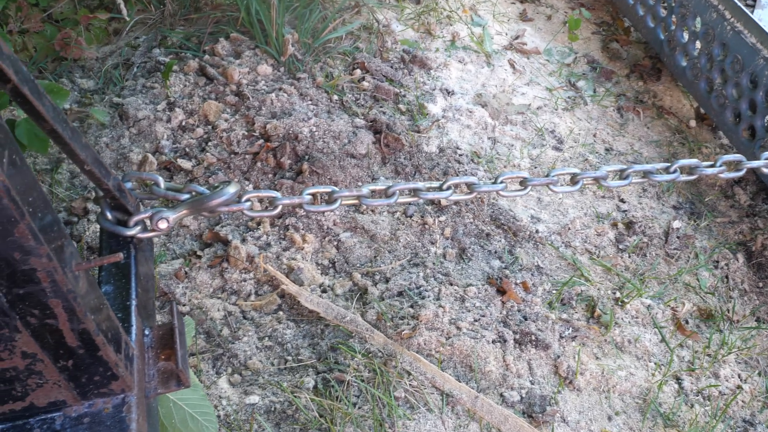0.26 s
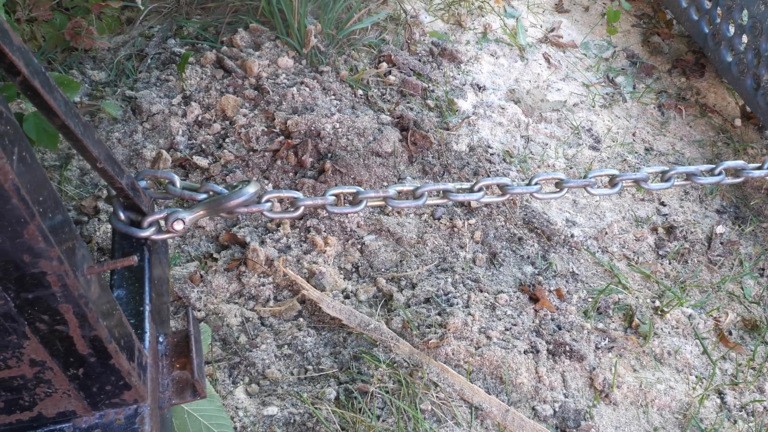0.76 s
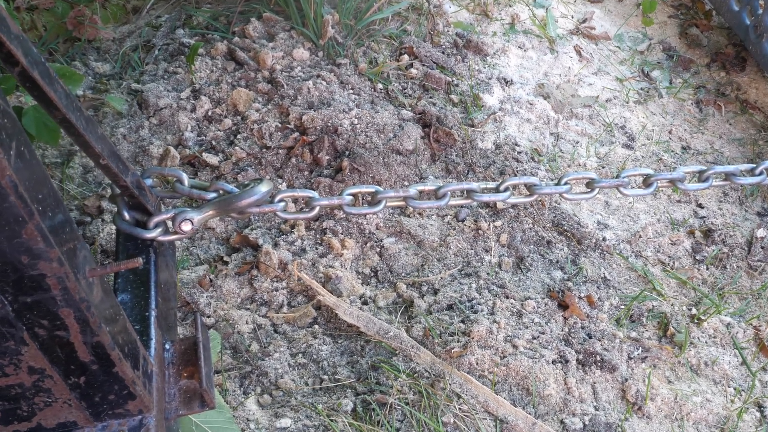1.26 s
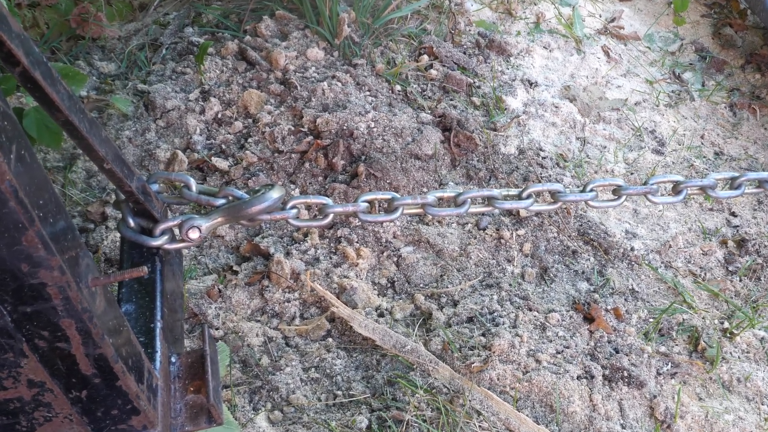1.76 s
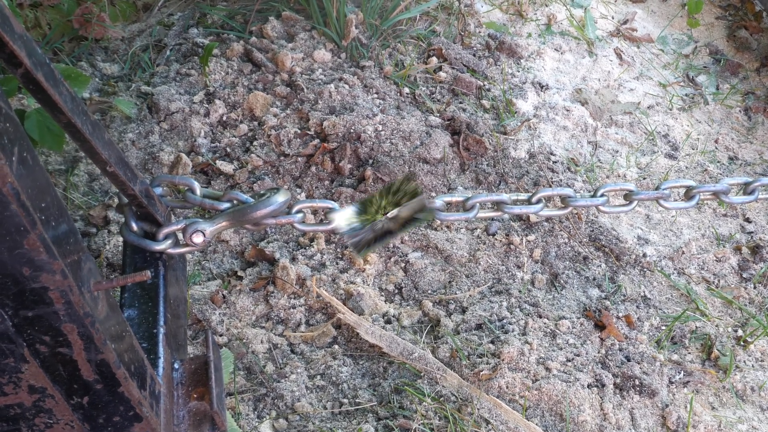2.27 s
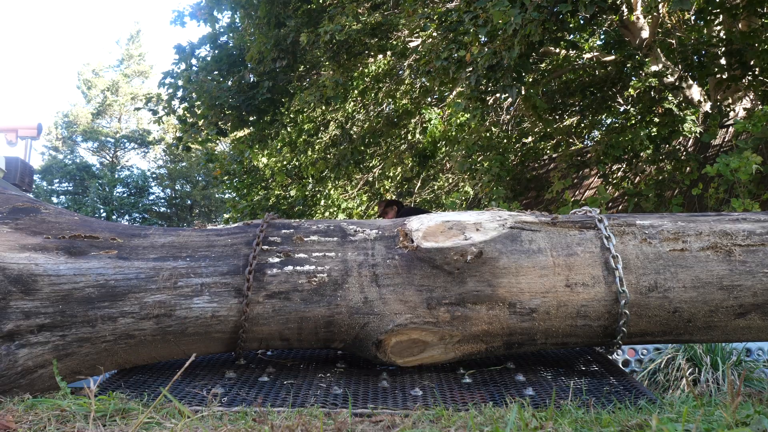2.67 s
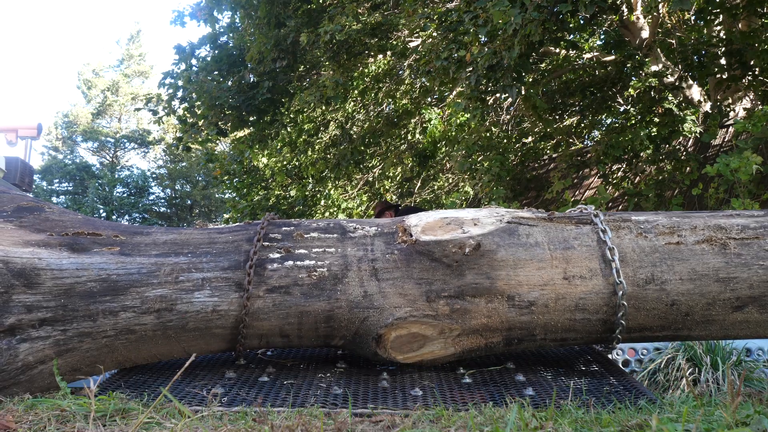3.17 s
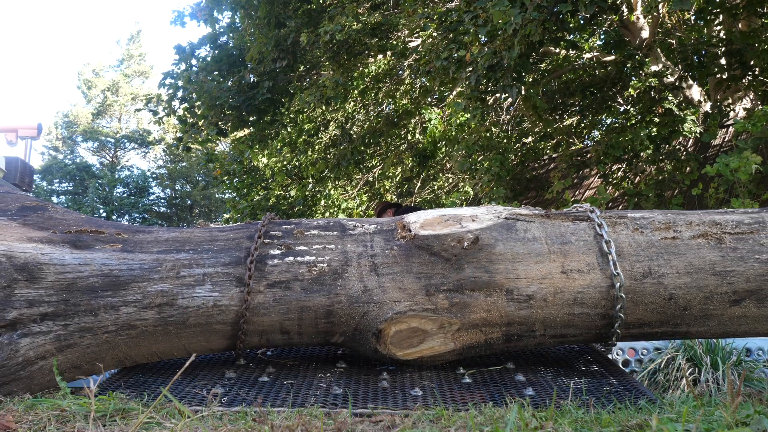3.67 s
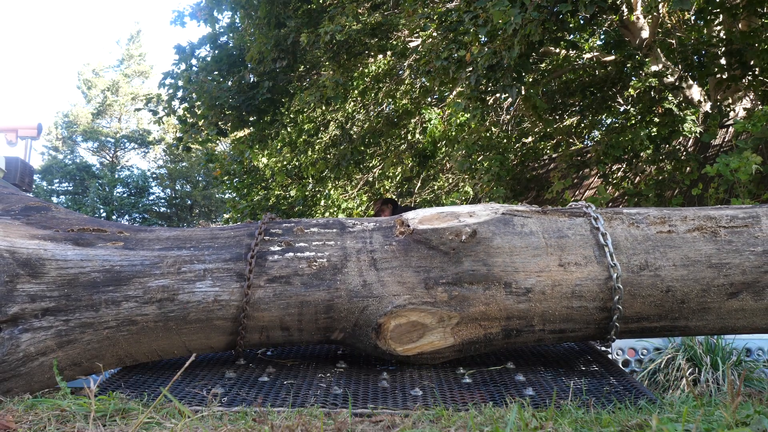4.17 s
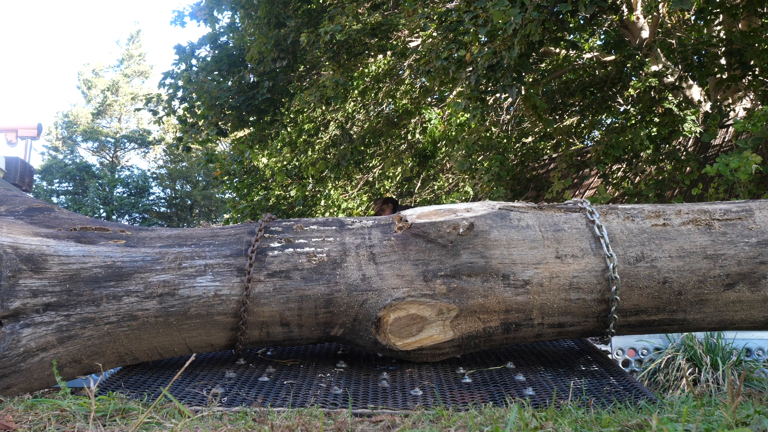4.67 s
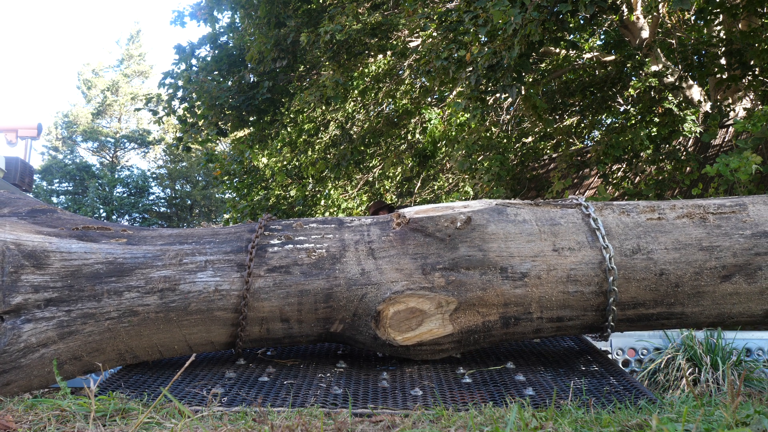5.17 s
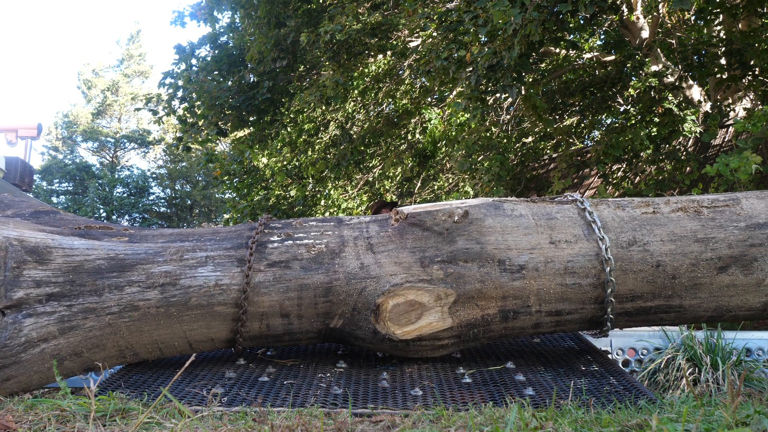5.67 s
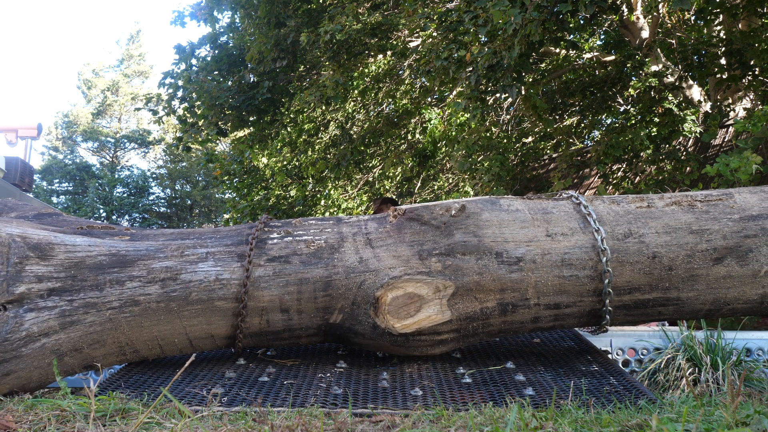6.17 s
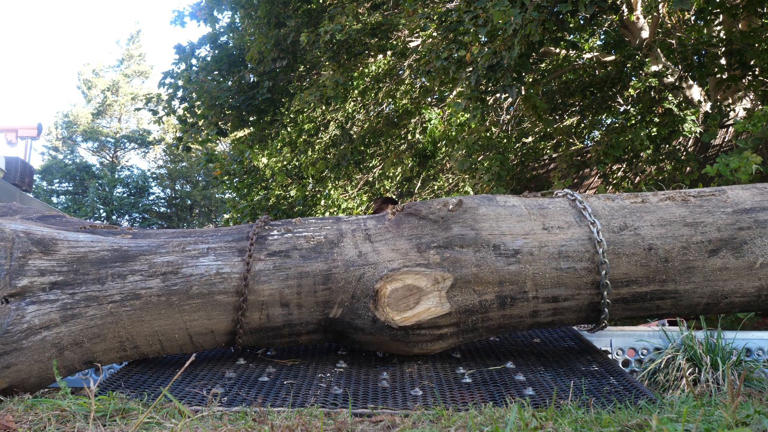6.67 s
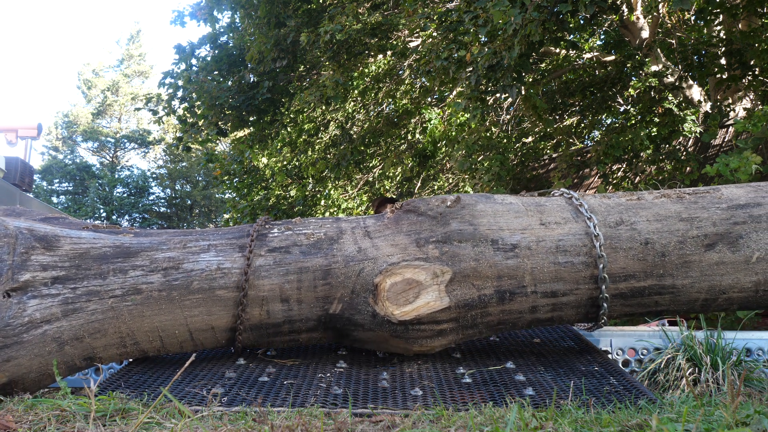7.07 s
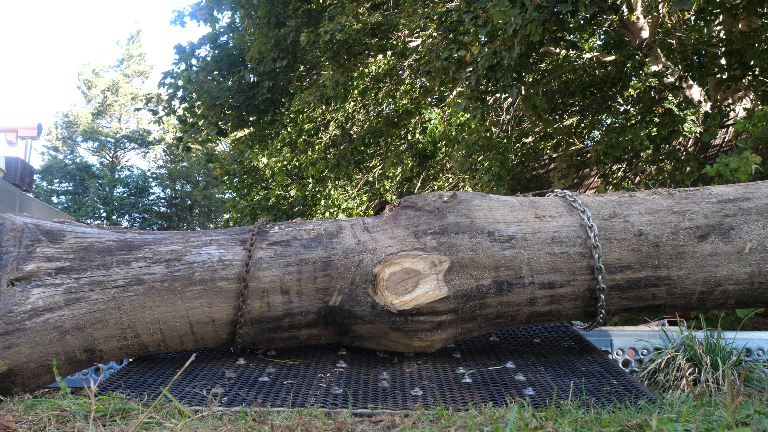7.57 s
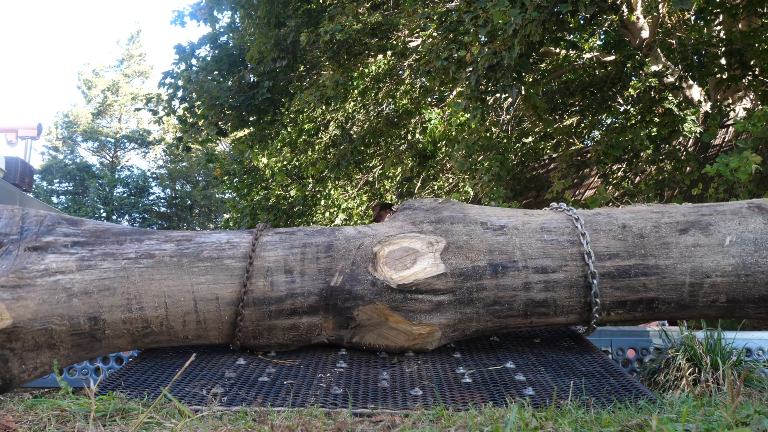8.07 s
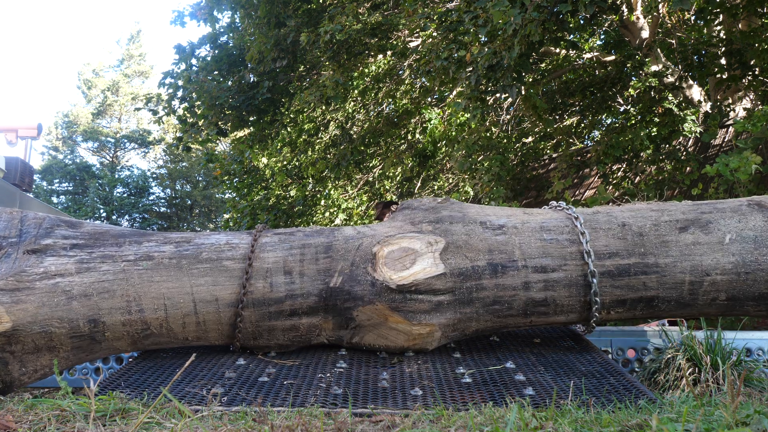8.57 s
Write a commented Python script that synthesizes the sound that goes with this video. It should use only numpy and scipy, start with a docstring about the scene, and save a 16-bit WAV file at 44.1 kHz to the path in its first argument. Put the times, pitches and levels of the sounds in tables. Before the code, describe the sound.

From 0 to 2.4 s it is very quiet outdoors: a low distant rumble and faint hiss, with tiny soft chain ticks in the first second, thin, rough squeaks around 1.1 and 1.4 s that rise slightly and fall, and faint knocks near 1.6 and 2.2 s. At 2.4 s an electric winch cuts in abruptly, already working and far louder. Loose gear teeth clack irregularly and rattle densely, ringing a metal housing brightly, over hissy scraping and rough low-mid grinding that swell about six times a second. Its strength shifts slightly with the load. Knocks from the chained log come near 3.1, 3.9, 5.6 (the strongest) and 6.5 s, with very short gliding groans near 3.1 and 4.2 s. From 7.9 s short jerky creaks join and a low breeze buffets the microphone, strongest near 7.9 s. The winch is still grinding at the end, about 8.8 s. Mono, dry, open air.

```python
"""Outdoors, over far rumble and faint hiss, a chain under strain ticks, squeaks and knocks faintly.
From 2.4 s an electric winch is suddenly heard at work, rolling a log; a light breeze touches the microphone.
A gear binds once a turn, about six times a second, so scraping and grinding swell.
Loose teeth clack and rattle as noise bursts that ring the metal housing through resonant filters.
The chained log knocks in damped modes, groans in gliding tones and at the end creaks in stick-slip jerks."""
import sys
import numpy as np
from scipy import signal
from scipy.fft import rfft, irfft
from scipy.io import wavfile
from scipy.ndimage import uniform_filter1d

SR = 44100
rng = np.random.default_rng(int(sys.argv[2]) if len(sys.argv) > 2 else 0)


def file_out(sig):
    """Save sig as 16-bit WAV at sys.argv[1]."""
    # one column per channel
    cols = np.atleast_2d(sig).T
    # limit, then scale
    lim = np.clip(cols, -1, 1)
    pcm = np.round(lim * 32767).astype(np.int16)
    wavfile.write(sys.argv[1], SR, pcm)


N = 388962
TIME_S = np.arange(N) / SR

# Moment and length of the fade-in to the working winch.
WINCH_HEARD_S, FADE_IN_S = 2.398, 0.035
# A moment when the gear binds hardest; pitch of the squeaks' second partial.
TIGHT_S, SQUEAK_RING_HZ = 3.4, 2380
SPOTS = 16  # places on the housing where a blow may land
TOP_HZ = 15850

# Levels in the tables are nominal: the functions add their own gains and filters.
# Loudest clacks of the gear train. Each row: time in seconds, level in dB.
CLACK_EVENTS = [(2.4319, -31.5), (2.461, -36.5), (2.499, -39), (2.545, -37), (2.5708, -37), (2.6042, -31),
                (2.628, -33.5), (2.68, -31.5), (2.696, -38), (2.7144, -34), (2.7609, -31), (2.776, -32),
                (2.7863, -33.5), (2.825, -33), (2.8488, -33.5), (2.8636, -36), (2.888, -33), (2.9119, -31),
                (2.9222, -31.5), (3.0353, -36), (3.067, -33.5), (3.0931, -35), (3.2013, -32),
                (3.217, -36.5), (3.2627, -32.5), (3.2935, -37), (3.3155, -36), (3.414, -29.5), (3.462, -33),
                (3.5017, -35), (3.5192, -36.0), (3.532, -35), (3.5424, -36), (3.569, -33.5), (3.579, -30),
                (3.64, -34.5), (3.6949, -37), (3.7184, -36), (3.7395, -30.5), (3.802, -35.5), (3.817, -35),
                (3.831, -35), (3.84, -31), (3.854, -41), (3.867, -36), (3.8758, -29.5), (3.928, -34),
                (3.9487, -34.5), (3.962, -35), (3.9998, -36.5), (4.027, -35.5), (4.0448, -33.0),
                (4.083, -33.5), (4.0974, -35.5), (4.117, -35.5), (4.1328, -34), (4.155, -35),
                (4.1927, -38.5), (4.2135, -32.5), (4.268, -34.5), (4.285, -35), (4.2984, -32),
                (4.3122, -34.5), (4.3252, -33), (4.3545, -31.5), (4.417, -42), (4.448, -42), (4.4743, -34),
                (4.5162, -29), (4.5728, -32.5), (4.589, -35), (4.6406, -35), (4.654, -34), (4.712, -35),
                (4.7991, -37), (4.8309, -32), (4.84, -32), (4.9654, -33.5), (4.9996, -30), (5.036, -32),
                (5.0683, -33), (5.0951, -32), (5.1671, -37), (5.1942, -30.5), (5.2542, -40), (5.276, -31),
                (5.2918, -32.5), (5.3109, -32.5), (5.3398, -34), (5.4016, -32.5), (5.4586, -39),
                (5.491, -33), (5.5179, -34), (5.543, -32.5), (5.613, -31), (5.7023, -34.5), (5.7337, -34),
                (5.772, -32), (5.8185, -30.5), (5.8353, -34.5), (5.8996, -35.5), (5.9259, -32.5),
                (5.9517, -31.5), (5.9685, -32), (6.0532, -34), (6.1161, -32.5), (6.136, -35),
                (6.1836, -34.5), (6.2, -41), (6.232, -36), (6.346, -32.5), (6.3623, -35), (6.433, -32.5),
                (6.487, -32.0), (6.516, -34), (6.5488, -39), (6.594, -31.5), (6.6528, -37.0), (6.6918, -32),
                (6.706, -34), (6.7333, -35), (6.7944, -33.5), (6.8559, -32.5), (6.87, -35), (6.8826, -31),
                (6.967, -32.5), (6.9844, -34), (7.0004, -35.5), (7.0604, -32.5), (7.0797, -35),
                (7.1789, -35), (7.195, -36), (7.2163, -33.5), (7.2361, -32), (7.2843, -34), (7.298, -35),
                (7.3183, -34), (7.3676, -29.5), (7.4332, -33), (7.483, -32.5), (7.5125, -32.5),
                (7.5364, -37.5), (7.564, -42.5), (7.586, -35.5), (7.6218, -31), (7.638, -37),
                (7.6478, -35.5), (7.6723, -34), (7.7135, -37), (7.7341, -32.5), (7.7806, -35),
                (7.7969, -35), (7.8067, -30), (7.9382, -31), (7.952, -33), (8.1418, -33), (8.1729, -33),
                (8.189, -34.5), (8.2162, -34.5), (8.244, -33.5), (8.2884, -35), (8.4163, -36.5),
                (8.4312, -35), (8.4468, -35), (8.4834, -31), (8.5272, -38), (8.568, -34), (8.612, -33),
                (8.6688, -36.5), (8.7124, -34), (8.7626, -33), (8.7804, -31.5)]
# Winch housing resonances. Each row: centre in Hz, width in Hz, lift in dB.
HOUSING_MODES = [(268.6, 40, 7.5), (414, 72, 5), (642, 79, 5), (989, 48, 4), (1156, 27, 8.5),
                 (1399, 110, 10.5), (1615, 98, 6), (1865, 247, 5.5), (2458, 204, 8.5), (2692, 115, 7.5),
                 (3030, 340, 3.5), (4073, 226, 9.5), (4600, 220, -0.5), (5035, 190, 14), (5570, 150, 1),
                 (7280, 200, 5), (8086, 690, 12.5), (9430, 270, 3.5), (10800, 400, 7), (11470, 650, 5),
                 (13850, 400, 20), (15060, 300, 1)]
# Regions of the ring that swell or fade as cable fills the drum. Each row: centre in Hz, drift in dB per second.
DRUM_DRIFT = [(1500, -0.1), (2550, 0), (3200, -0.9), (4050, 0.25), (5060, 0.37), (6500, 0.1), (8100, -0.24),
              (13000, 0)]
# Broad colour of steel contacts. Each row: frequency in Hz, level in dB.
CLACK_SPECTRUM = [(80, -35), (300, -19.5), (700, -9.5), (1240, -13.5), (1500, -5.5), (2200, -4.5),
                  (3200, -0.5), (4600, -5.5), (6000, -8), (6900, -13), (8800, -9.5), (10100, -13),
                  (12700, -16), (15500, -21)]
# Broad colour of the grinding. Each row: frequency in Hz, level in dB.
GRIND_SPECTRUM = [(25, -22), (90, -11), (150, -5.5), (200, -5.5), (330, 0), (550, -0.5), (800, 2),
                  (1240, -6.5), (2000, -3.5), (5000, -48.5)]
# Speed of the binding gear. Each row: time in seconds, turns per second.
GEAR_SPEED = [(2.4, 6.2), (3.5, 6.27), (4.7, 6.2), (5.5, 6.33), (6.9, 6.3), (7.45, 6.75), (8, 6.28)]
# Levels as the log's load shifts. Each row: time in seconds, fine rattle in dB, low grinding in dB.
LOAD_LEVELS = [(2.43, -53.5, -54), (2.6, -49, -54), (3.1, -43.0, -50.5), (3.3, -47, -52.5), (3.9, -43, -51),
               (4.3, -43.5, -49.5), (4.42, -49.5, -56.5), (4.55, -43.5, -50.5), (5.0, -48.5, -53.5),
               (5.3, -43.5, -50.5), (5.62, -42.5, -51), (5.75, -45.5, -52.5), (6.85, -45.0, -52.0),
               (7.75, -46, -50), (7.96, -41.0, -48.5), (8.1, -46, -49.5), (8.55, -46, -49),
               (8.8, -45.5, -48.5)]
# Knocks of log, chain and ramp. Each row: time in seconds, level in dB, central pitch in Hz,
# decay time constant in seconds.
KNOCK_EVENTS = [(1.595, -54.5, 840, 0.005), (1.597, -55, 393, 0.0045), (2.165, -60, 344, 0.011),
                (2.166, -62, 800, 0.011), (2.166, -59, 1640, 0.0028), (2.166, -71, 3200, .003),
                (2.287, -67, 1900, .003), (2.432, -46, 773, 0.011), (3.087, -48, 997, .008),
                (3.09, -54.5, 191, 0.032), (3.892, -49, 520, 0.015), (5.551, -41.5, 416, 0.012),
                (5.558, -48, 141.6, 0.019), (5.636, -52, 149.5, 0.02), (5.642, -47, 557, .01),
                (6.484, -46, 540, 0.017)]
# Chain biting into the log. Each row: start in seconds, length in seconds, level in dB, first pitch in Hz,
# last pitch in Hz.
GROAN_EVENTS = [(3.083, 0.019, -48, 417, 500), (3.106, .018, -45.5, 404, 490),
                (4.163, 0.028, -48.5, 539, 446), (4.187, 0.0391, -51.5, 599, 740),
                (4.244, .026, -46.5, 440, 550)]
# Creaks of the rolling log. Each row: start in seconds, length in seconds, level in dB.
CREAK_EVENTS = [(7.935, .045, -45), (8.046, 0.034, -43.5), (8.133, 0.031, -48), (8.21, 0.051, -45),
                (8.287, 0.034, -43.5), (8.467, 0.036, -45), (8.63, .025, -46.5), (8.784, 0.027, -43.5)]
# Broad colour of the creaks. Each row: frequency in Hz, level in dB.
CREAK_SPECTRUM = [(50, -20), (140, 0), (260, -9.5), (550, 0.5), (900, -2.5), (1500, -8.5), (4000, -22)]
# Ticks of the chain taking up strain. Each row: time in seconds, level in dB.
TICK_EVENTS = [(.019, -63), (.048, -58), (.086, -64), (.38, -69), (.552, -62.5), (1.049, -62)]
# Chain resonances. Each row: centre in Hz, width in Hz, lift in dB.
CHAIN_MODES = [(595, 170, 22.6), (2340, 460, 16)]
# Thin squeaks. Each row: start in seconds, length in seconds, level in dB, top pitch in Hz.
SQUEAK_EVENTS = [(1.107, 0.034, -61, 1415), (1.435, 0.038, -65, 1490)]
# Colour of the garden. Each row: frequency in Hz, level in dB.
GARDEN_SPECTRUM = [(25, -49), (55, -23), (85, -7), (130, 0), (190, -8), (330, -12), (600, -11.5),
                   (1050, -13), (1600, -21), (3300, -25.5), (5500, -25.5), (7600, -21.5), (11000, -28.5),
                   (15500, -33.5)]
# Level of the garden. Each row: time in seconds, level in dB.
GARDEN_LEVEL = [(0, -67.3), (2.25, -67.5), (2.38, -75)]
# Level of the breeze on the microphone. Each row: time in seconds, level in dB.
BREEZE_LEVEL = [(2.36, -110), (2.42, -77), (4.8, -76), (5.6, -75), (6.5, -76), (7.3, -74), (7.9, -67),
                (8.82, -74)]


def gears(bind):
    """Clacks and rattle ring the same metal housing."""
    return drum_filling(struck_housing(clacks() + rattle(bind)))


def clacks(strike_db=-0.5, shudder_db=-6, dull_hz=4600):
    """Force as the gears jump across their backlash: a bright strike, then a duller shudder."""
    strike_s, shudder_s, lag_s, tail_db = 0.0034, 0.0055, 0.002, -12
    times_s, levels_db = np.transpose(CLACK_EVENTS)
    spots = rng.integers(SPOTS, size=len(times_s))
    strike = blows(times_s, levels_db + strike_db, spots, strike_s, tail_db)
    shudder = blows(times_s + lag_s, levels_db + shudder_db, spots, shudder_s, tail_db)
    lowpass = signal.butter(2, dull_hz, fs=SR, output="sos")
    return strike + signal.sosfilt(lowpass, shudder)


def rattle(bind, tap_db=-38.5, follow=0.18, spread_db=2.5, settle_db_per_s=0.2):
    """Force of lighter tooth contacts, ticking at a loose pace from one loud clack to the next."""
    rate_hz, jitter_s, contact_s, tail_db = 64, 0.0032, 0.0035, -13
    marks_s = np.append(np.array(CLACK_EVENTS)[:, 0], TIME_S[-1])
    gaps = []
    for a, b in zip(marks_s, marks_s[1:]):
        steps = int(round((b - a) * rate_hz))
        gaps.append(np.linspace(a, b, steps + 1)[1:-1])
    times_s = np.concatenate(gaps)
    late, strength = rng.standard_normal((len(times_s), 2)).T
    # taps grow with the load, less than the scraping does, and soften as the pull goes on
    load_db = np.interp(times_s, TIME_S, curve(LOAD_LEVELS, column=1) + 4 * bind)
    load_db -= np.mean(np.array(LOAD_LEVELS)[:, 1])
    settle_db = settle_db_per_s * (times_s - WINCH_HEARD_S)
    levels_db = tap_db + follow * load_db - settle_db + spread_db * np.minimum(strength, 1)
    spots = rng.integers(SPOTS, size=len(times_s))
    return blows(times_s + jitter_s * late, levels_db, spots, contact_s, tail_db)


def blows(times_s, levels_db, spots, contact_s, tail_db, tail_s=0.0086, size=1100):
    """Force at each spot: a chatter of steel on steel that starts hard, dies in a few ms, with a weak tail."""
    t = np.arange(size) / SR
    fade = np.exp(-(t / contact_s) ** 2) + db_to_gain(tail_db) * np.exp(-t / tail_s)
    span = 0.004 * SR  # each blow's energy is that of its level held for 4 ms
    force = np.zeros((SPOTS, N))
    chatters = rng.standard_normal((len(times_s), size))
    for start_s, level_db, spot, chatter in zip(times_s, levels_db, spots, chatters):
        blow = np.tanh(2 * chatter) * fade
        add(force[spot], start_s, db_to_gain(level_db) * blow * np.sqrt(span / np.sum(blow ** 2)))
    return force


def struck_housing(forces):
    """Each spot favours other resonances, so the ring varies by blow; the highest ones vary least."""
    mode_db, colour_db, detune, steady_hz = 3.2, 0.7, 0.012, 3800
    hz, width_hz, lift_db = np.array(HOUSING_MODES).T
    colour_hz, level_db = np.array(CLACK_SPECTRUM).T
    loose = 1 / np.hypot(1, (hz / steady_hz) ** 2)
    chance = rng.standard_normal((SPOTS, 3, len(hz)))
    chance = np.clip(chance - chance.mean(0), -1.5, 1.5)
    out = np.zeros(N)
    for force, (lift, shift, tint) in zip(forces, chance):
        spot_hz = hz * (1 + detune * loose ** 2 * shift)
        modes = np.c_[spot_hz, width_hz, lift_db + mode_db * loose * lift]
        colour = np.c_[colour_hz, level_db + colour_db * tint[:len(colour_hz)]]
        out += body(force, colour, modes)
    return out


def drum_filling(x):
    """The balance of the ring drifts between overlapping bands as cable fills the drum."""
    centres_hz, drifts_db_per_s = np.transpose(DRUM_DRIFT)
    spectrum, hz = rfft(x), np.arange(N // 2 + 1) * SR / N
    from_mid_pull_s = TIME_S - (WINCH_HEARD_S + TIME_S[-1]) / 2
    out = np.zeros(N)
    for share, drift in zip(np.eye(len(centres_hz)), drifts_db_per_s):
        band = irfft(spectrum * np.interp(hz, centres_hz, share), N)
        out += band * db_to_gain(drift * from_mid_pull_s)
    return out


def scraping(bind, gain_db=-4.5, swell_db=3.5, ringing=0.7, uneven_db=3.0):
    """Tooth flanks slide in an uneven hiss, which rings the housing less than a blow does."""
    level_db = curve(LOAD_LEVELS, column=1) + gain_db + swell_db * bind + uneven_db * walk(50)
    modes = [(hz, width_hz, ringing * lift_db) for hz, width_hz, lift_db in HOUSING_MODES]
    force = db_to_gain(level_db) * rng.standard_normal(N) * fade_in()
    return body(force, CLACK_SPECTRUM, modes)


def grinding(bind, gain_db=-0.33, rough_db=2.0, swell_db=2.0):
    """Loaded teeth roll roughly over each other and shake the frame, hardest where the gear binds."""
    force = unit(rng.standard_normal(N) * db_to_gain(rough_db * walk(140)))
    level_db = curve(LOAD_LEVELS, column=2) + gain_db + swell_db * bind
    return body(force * db_to_gain(level_db) * fade_in(), GRIND_SPECTRUM, HOUSING_MODES)


def binding(uneven=0.19):
    """How hard the gear binds, about -1 to 1: one swell a turn, no two quite alike."""
    turns = np.cumsum(curve(GEAR_SPEED)) / SR
    tight_turns = np.interp(TIGHT_S, TIME_S, turns)
    return np.cos(2 * np.pi * (turns - tight_turns)) * (1 + uneven * walk(4.4))


def fade_in():
    """0 before the winch is heard, fading in quickly to 1."""
    return np.clip((TIME_S - WINCH_HEARD_S) / FADE_IN_S, 0, 1)


def knocks(spread=0.122, crack_db=-9, count=7):
    """A knock starts with a brief crack and rings a cluster of close, quickly damped modes."""
    out, t = np.zeros(N), np.arange(SR // 5) / SR
    chances = rng.standard_normal((len(KNOCK_EVENTS), 2, count))
    for (start_s, level_db, hz, decay_s), (detune, phase) in zip(KNOCK_EVENTS, chances):
        modes_hz = hz * np.exp(spread * detune)
        fade = np.exp(-t / decay_s)
        ring = np.sin(2 * np.pi * (modes_hz[:, None] * t + phase[:, None])).sum(0)
        ring *= fade * (1 - np.exp(-t * hz * 2))
        add(out, start_s, db_to_gain(level_db) * ring * np.sqrt(decay_s * SR / np.sum(ring ** 2)))
        # the higher the pitch, the harder the contact and the brighter its crack
        edges_hz = [hz / 2, min(1.8 * hz, SR / 4)]
        b, a = signal.butter(2, edges_hz, "bandpass", fs=SR)
        crack = signal.lfilter(b, a, rng.standard_normal(len(t))) * fade
        scale = np.sqrt(decay_s * SR / np.sum(crack ** 2))
        add(out, start_s, db_to_gain(level_db + crack_db) * crack * scale)
    return out


def groans(octave_db=-14):
    """The chain bites into the wood and slips: a short, rough tone that glides as the strain changes."""
    rough, flutter_db = 0.05, 2.5
    out, waver, flutter = np.zeros(N), walk(500), walk(250)
    for start_s, length_s, level_db, from_hz, to_hz in GROAN_EVENTS:
        n, i = int(length_s * SR), int(start_s * SR)
        pitch_hz = np.geomspace(from_hz, to_hz, n) * (1 + rough * waver[i:i + n])
        voice = tone(pitch_hz) + db_to_gain(octave_db) * tone(2 * pitch_hz)
        voice *= db_to_gain(flutter_db * flutter[i:i + n])
        add(out, start_s, db_to_gain(level_db) * unit(voice * np.hanning(n) ** 0.5))
    return out


def creaks(slips_per_s=300, scatter_db=2.5):
    """The log sticks and slips on its ramp: each creak is a short, swelling run of uneven jerks."""
    force = np.zeros(N)
    for start_s, length_s, level_db in CREAK_EVENTS:
        n = int(length_s * SR)
        slips = np.cumsum(rng.gamma(4, 1 / 4, size=60)) * SR / slips_per_s
        sizes = db_to_gain(scatter_db * rng.standard_normal(len(slips)))
        jerks = np.bincount(slips.astype(int), sizes, minlength=n)[:n]
        add(force, start_s, db_to_gain(level_db) * unit(jerks * np.hanning(n) ** 0.5))
    return body(force, CREAK_SPECTRUM, HOUSING_MODES)


def chain_ticks(gain_db=1):
    """Links settle against each other with small soft ticks."""
    times_s, levels_db = np.transpose(TICK_EVENTS)
    one_spot = np.zeros(len(times_s), int)
    force = blows(times_s, levels_db + gain_db, one_spot, contact_s=0.0036, tail_db=-12)[0]
    return body(force, [(200, -5), (600, 0.5), (2500, -4.5), (6000, -23)], CHAIN_MODES)


def squeaks(high_db=-6, whistle_db=-77.0, whistle_s=0.12):
    """Two rough partials and their faint sum tone rise briefly, glide down; the second lingers as a whistle."""
    arch, crest, rough, waver, flutter_db = 0.22, -0.2, 0.04, 0.014, 4
    out = np.zeros(N)
    for start_s, length_s, level_db, hz in SQUEAK_EVENTS:
        u = np.linspace(-1, 1, int(length_s * SR))
        swell = np.sqrt(2 * np.abs(np.cos(u * np.pi / 2))) * (1 + u / 2)  # loudest as the pitch falls
        partials = [(hz, arch, 0), (SQUEAK_RING_HZ, arch / 2, high_db),
                    (hz + SQUEAK_RING_HZ, arch, high_db - 13)]
        for top_hz, depth, part_db in partials:
            pitch_hz = top_hz * (1 - depth * (u - crest) ** 2) * (1 + rough * walk(1200)[:len(u)])
            add(out, start_s, db_to_gain(level_db + part_db) * swell * tone(pitch_hz))
        n = int(whistle_s * SR)
        whistle = tone(SQUEAK_RING_HZ * (1 + waver * walk(300)[:n]))
        whistle *= db_to_gain(flutter_db * walk(60)[:n])
        whistle *= np.linspace(1, 0, n) ** 0.7
        add(out, start_s + length_s, db_to_gain(whistle_db) * unit(whistle))
    return out


def garden(swell_db=0.8):
    """A far rumble and a faint hiss of leaves and insects: coloured noise, swelling gently."""
    level_db = curve(GARDEN_LEVEL) + swell_db * walk(5.1)
    return body(rng.standard_normal(N), GARDEN_SPECTRUM) * db_to_gain(level_db)


def breeze(gust_db=3):
    """Small eddies buffet the microphone: gusting low noise."""
    colour = [(12, -44), (45, -1.5), (70, -4.0), (140, -15), (500, -53)]
    eddies = body(rng.standard_normal(N), colour)
    return eddies * db_to_gain(curve(BREEZE_LEVEL) + gust_db * walk(12))


def body(x, colour, modes=(), size=8192):
    """Pass x through a causal filter of unit energy: a broad colour lifted at each resonance."""
    hz = np.maximum(np.arange(size // 2 + 1) * SR / size, 1)
    points = np.array(colour)
    db = np.interp(np.log(hz), np.log(points[:, 0]), points[:, 1])
    for centre_hz, width_hz, lift_db in modes:
        db = db + lift_db / (1 + (2 * (hz - centre_hz) / width_hz) ** 2)
    # minimum phase: fold the cepstrum onto positive time
    cepstrum = irfft(np.log(db_to_gain(db)))
    cepstrum[1:size // 2] *= 2
    cepstrum[size // 2 + 1:] = 0
    response = irfft(np.exp(rfft(cepstrum)))
    return signal.fftconvolve(x, response / np.linalg.norm(response))[:N]


def tone(hz):
    """A sine that follows a pitch curve."""
    return np.sin(2 * np.pi * np.cumsum(hz) / SR)


def walk(rate_hz):
    """Smooth random curve with rate_hz new values a second, scaled to rms 1."""
    k = max(int(SR / rate_hz), 1)
    steps = np.repeat(rng.standard_normal(N // k + 1), k)
    return unit(uniform_filter1d(steps, k)[:N])


def curve(table, column=1):
    """One column of a table, joined by straight lines in time."""
    rows = np.array(table)
    return np.interp(TIME_S, rows[:, 0], rows[:, column])


def add(out, start_s, sound):
    """Mix a sound in at start_s."""
    i = int(np.clip(start_s * SR, 0, N - 1))
    out[i:i + len(sound)] += sound[:N - i]


def unit(x):
    """Scale to rms 1."""
    return x / np.sqrt(np.mean(x ** 2))


def db_to_gain(db):
    """Decibels to amplitude gain."""
    return 10 ** (np.asarray(db) / 20)


def scene():
    """Winch, log, chain and surroundings in one channel."""
    bind = binding()
    winch = gears(bind) + scraping(bind) + grinding(bind)
    log = knocks() + groans() + creaks()
    chain = chain_ticks() + squeaks()
    return (winch + log + chain + garden() + breeze())[None]


def record(dry):
    """A steep elliptic low-pass cuts the top."""
    lowpass = signal.ellip(10, 0.2, 80, TOP_HZ, fs=SR, output="sos")
    return signal.sosfilt(lowpass, dry)


dry = scene()
out = record(dry)
file_out(out)
```